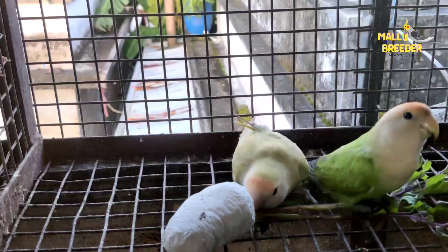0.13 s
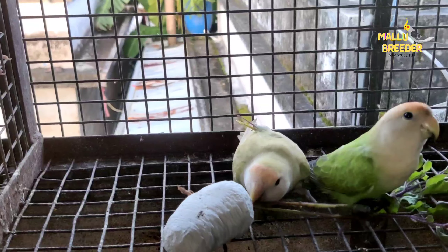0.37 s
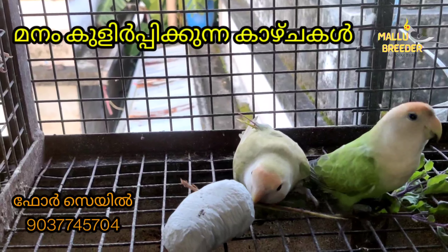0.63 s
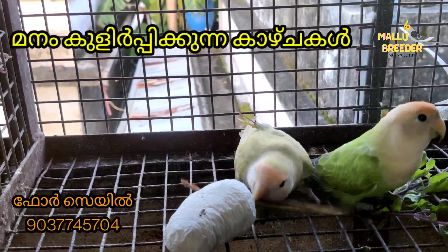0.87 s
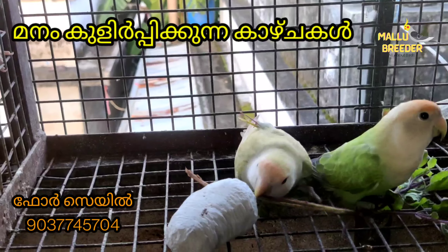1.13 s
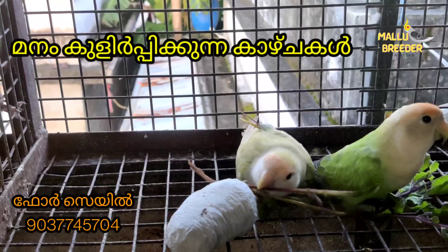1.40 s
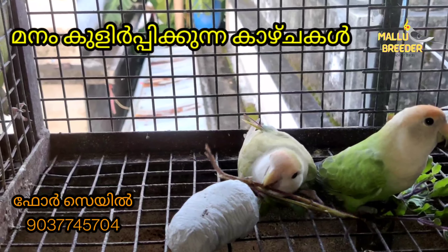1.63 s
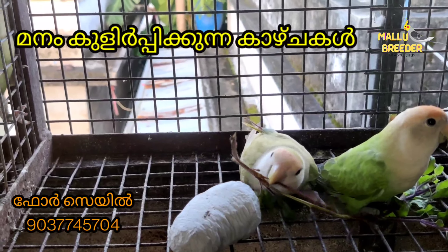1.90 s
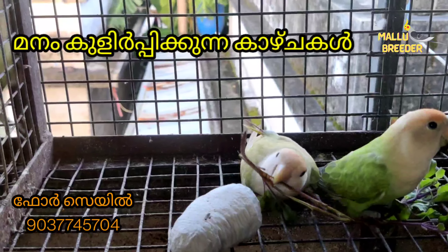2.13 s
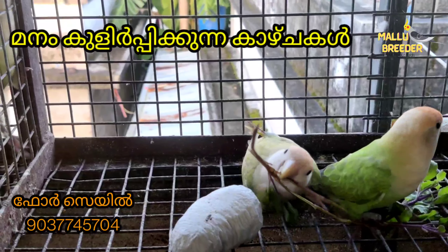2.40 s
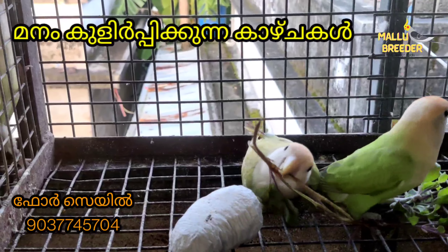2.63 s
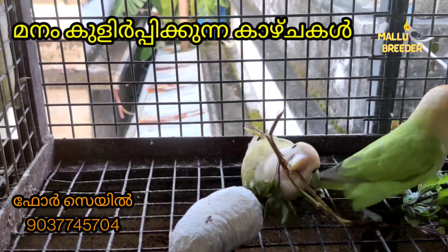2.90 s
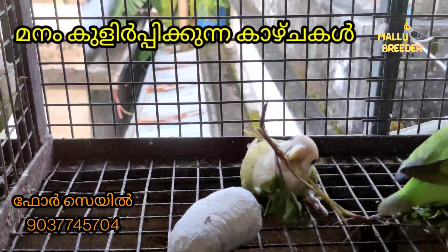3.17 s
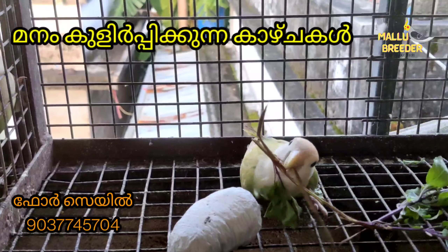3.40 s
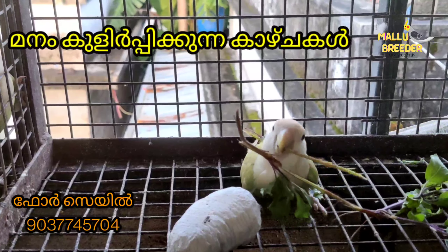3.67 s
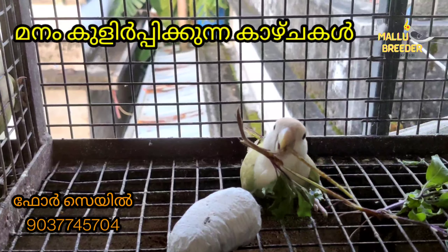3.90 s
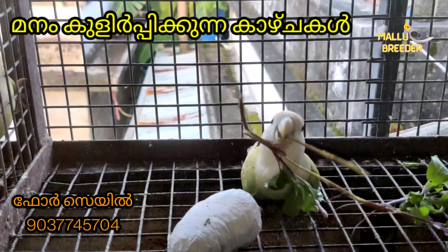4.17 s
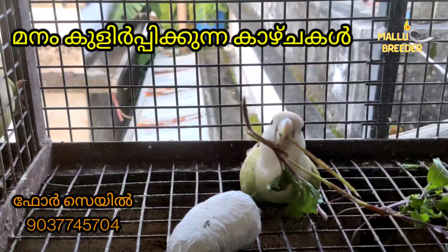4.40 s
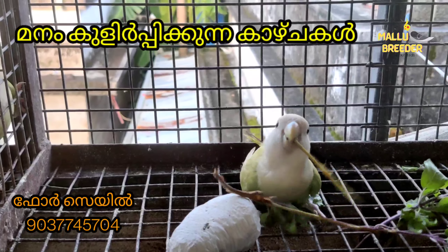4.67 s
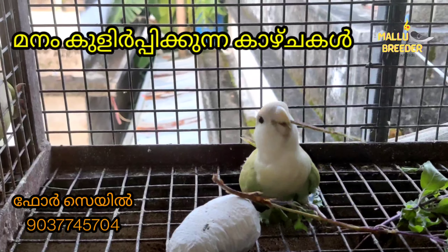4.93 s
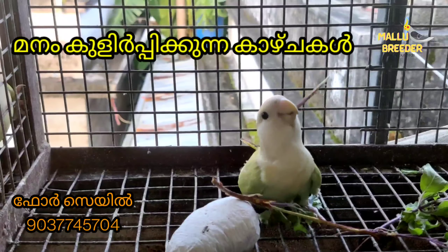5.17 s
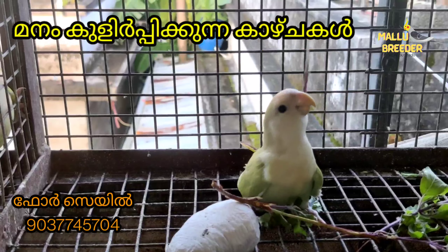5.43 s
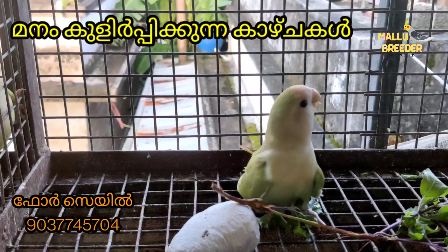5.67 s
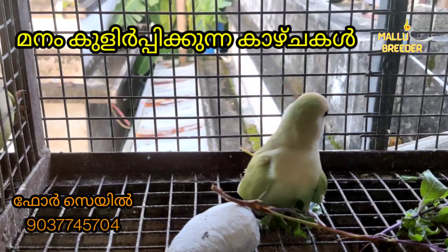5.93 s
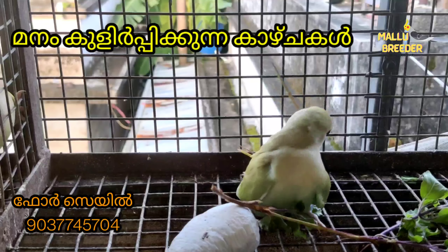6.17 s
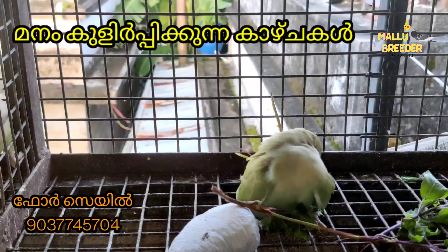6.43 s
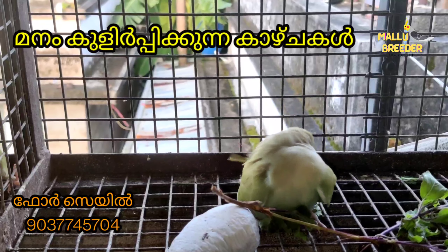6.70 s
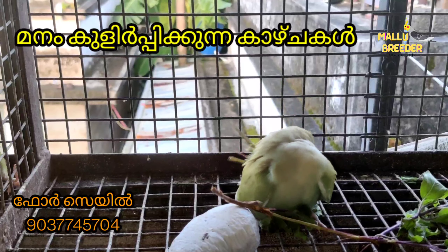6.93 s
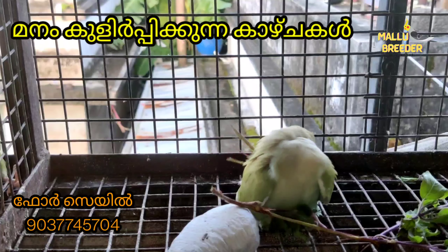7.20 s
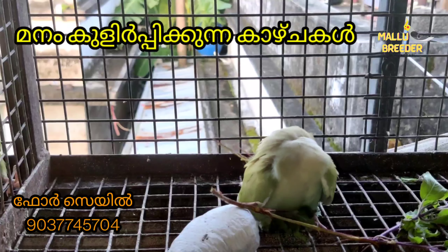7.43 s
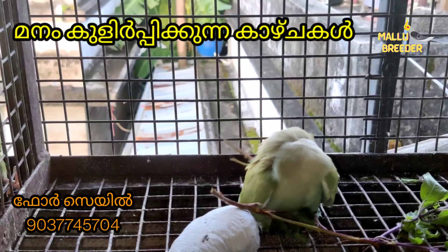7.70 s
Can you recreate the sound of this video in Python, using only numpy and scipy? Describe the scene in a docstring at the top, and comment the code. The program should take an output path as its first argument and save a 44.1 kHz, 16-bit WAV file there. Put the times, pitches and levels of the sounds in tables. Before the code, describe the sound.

Several small parrots call in wire cages in a hard-walled, partly open place. Scattered chirps, distant thin piping and light knocks on twig and wire come first, with outdoor rumble and rustle peaking early. Rasping squawks give way to crowded shrill twittering, then more squawks, a brief lull and one piercing scream. Close phone pickup, wide and bright, with a short reverberant tail.

```python
"""Small parrots chatter in wire cages: short gliding whistles, hoarse squawks, twitter and one long shrill scream.
A far bird pipes, beaks knock on twigs and wire, and outdoor rumble, rustle and hiss swell and sink behind them.
Voices are moving sine tones, roughened by random pitch and loudness, with noise for breath. Knocks are short
rings with a crack; the outdoor air is coloured noise. A phone with two microphone ports hears it all."""
import sys
import numpy as np
from scipy import signal
from scipy.fft import rfft, irfft, next_fast_len
from scipy.io import wavfile
from scipy.ndimage import uniform_filter1d

SR = 44100
rng = np.random.default_rng(int(sys.argv[2]) if len(sys.argv) > 2 else 0)


def magnitude_from_level(level_db):
    """Linear magnitude for a level in decibels (20 dB per decade)."""
    exponent = np.asarray(level_db, float) / 20
    return 10 ** exponent


def log_audio(samples):
    """Write samples as a 16-bit WAV file to the path given in sys.argv[1]."""
    # one column per channel
    frames = np.atleast_2d(samples).T
    # limit to full scale, then quantise
    limited = np.clip(frames, -1, 1)
    pcm = np.round(limited * 32767).astype(np.int16)
    wavfile.write(sys.argv[1], SR, pcm)


N = 344862
T = np.arange(N) / SR  # time in seconds
FFT = next_fast_len(N)
BIN_HZ = np.arange(FFT // 2 + 1) * SR / FFT

# Noise colours of rustle and hiss, used outdoors and in the scream's breath: [f/Hz, relative level/dB]
RUSTLE_COLOUR = [(71, -59.5), (120, -5), (572, -4), (1010, -10), (1220, -8), (3000, -18.5), (3900, -54.5),
                 (6600, -120)]
HISS_COLOUR = [(880, -11), (1500, -5.5), (4500, -2.5), (5940, 2), (7240, 7.5), (7920, 1), (13400, -14),
               (15100, -18.5), (16000, -52.5)]


def level(x, db):
    """Scale a sound to an rms level in dB."""
    return x * magnitude_from_level(db) / np.sqrt(np.mean(x ** 2))


def along(points, hz):
    """Read a (Hz, value) table on a logarithmic frequency axis."""
    at, value = np.transpose(points)
    return np.interp(np.log(hz + 1), np.log(at), value)


def colour(points, channels=1):
    """Noise with a given spectrum, silent outside the table's range, rms 1."""
    inside = (BIN_HZ >= points[0][0]) & (BIN_HZ <= points[-1][0])
    white = rfft(rng.standard_normal((channels, FFT)))
    shaped = white * magnitude_from_level(along(points, BIN_HZ)) * inside
    return level(irfft(shaped, FFT)[:, :N], 0)


def walk(rate, size=N):
    """Smooth random curve, rms 1, that turns about rate times a second."""
    k = max(int(SR / rate), 1)
    smooth = uniform_filter1d(rng.standard_normal(size), k)
    return level(uniform_filter1d(smooth, k), 0)


def tone(hz, k=1):
    """Sine at k times a moving pitch, rms 1."""
    return np.sqrt(2) * np.sin(2 * np.pi * k * np.cumsum(hz) / SR)


def played(rows, fade_s=0.005):
    """Turn a table of curves into one value per sample, with a gate that is open while the table lasts."""
    s, *columns = np.transpose(rows)
    gate = np.interp(T, [s[0] - fade_s, s[0], s[-1], s[-1] + fade_s], [0, 1, 1, 0])
    return [np.interp(T, s, c) for c in columns], gate


def air():
    """Outdoor noise: rumble mostly alike at both ports, rustle half alike, hiss unrelated."""
    # Loudness of the outdoor noise: [t/s, rumble level/dB, rustle level/dB, hiss level/dB]
    air_levels = [(0, -106, -100, -84), (.12, -72, -90, -79), (.25, -40.5, -53, -44.5),
                  (.6, -37.5, -40.5, -33.5), (1.9, -33.5, -45, -35.5), (2.07, -31.5, -36, -29.5),
                  (2.42, -33, -48.5, -34.5), (2.6, -26, -33.5, -27.5), (2.9, -44, -49, -38.5),
                  (4.2, -44, -52.5, -39.5), (5.4, -47, -54.5, -28), (6.95, -50.5, -57.5, -47),
                  (7.39, -53, -49.5, -27.5), (7.43, -68, -79, -42.5), (7.55, -59, -56.5, -51.5),
                  (7.82, -59, -63.5, -56.5)]
    # Noise colour of the rumble: [f/Hz, relative level/dB]
    rumble_colour = [(12, -9.5), (20, 2), (81, -7), (178, -17), (250, -13), (320, -21.5), (550, -120)]
    (rumble_db, rustle_db, hiss_db), _ = played(air_levels)
    rumble = colour(rumble_colour) + 0.24 * colour(rumble_colour, channels=2)
    rumble = rumble * magnitude_from_level(rumble_db + 0.5 * walk(8.5))
    rustle = colour(RUSTLE_COLOUR) + 0.94 * colour(RUSTLE_COLOUR, channels=2)
    left_right_db = np.array([[1.5], [-1.5]])
    rustle = rustle * magnitude_from_level(rustle_db + 2.4 * walk(19) + left_right_db)
    flicker_db = 1.2 * walk(14)
    hiss = colour(HISS_COLOUR, channels=2) * magnitude_from_level(hiss_db + flicker_db)
    return rumble + rustle + hiss


def far_birds():
    """Far piping and low murmurs: thin sine whistles that throb; random pitch makes the murmurs rattle."""
    # Far whistles and murmurs: [t/s, length/s, start f/Hz, end f/Hz, level/dB]
    piping = [(0.419, 0.098, 1176, 1185, -39), (.55, 0.093, 1294, 1128, -35),
              (0.636, 0.11, 1207, 1290, -39), (0.773, 0.052, 1333, 1110, -30),
              (0.896, 0.062, 1140, 1290, -35.5), (0.957, 0.19, 1243, 1436, -31.5),
              (1.138, 0.071, 1434, 1170, -34.5), (1.26, 0.074, 1250, 1183, -32),
              (1.396, 0.087, 1315, 1147, -32), (1.484, 0.12, 1217, 1266, -35.5),
              (2.001, 0.13, 1303, 1300, -33), (2.117, 0.12, 1198, 1207, -36.5),
              (2.264, 0.041, 1257, 1100, -33), (2.642, 0.12, 1377, 1214, -32.5),
              (2.794, .1, 1260, 1370, -39), (2.968, 0.1, 1556, 1507, -33.5),
              (3.054, 0.078, 1390, 1182, -45), (5.348, 0.119, 870, 825, -42.5),
              (5.536, .19, 889.5, 931, -43), (6.842, 0.13, 1352, 1270, -44.5),
              (7.505, 0.13, 1756, 1986, -41.5), (7.509, 0.094, 3530, 3870, -50.5),
              (7.585, .22, 560, 561, -53)]
    out, waver, rattle, throb = np.zeros(N), walk(90), walk(260), walk(55)
    for s, length, start_hz, end_hz, db in piping:
        i, n = int(s * SR), int(length * SR)
        is_murmur = start_hz < 1000
        shake = .022 * waver[i:i + n] + .16 * is_murmur * rattle[i:i + n]
        hz = np.linspace(start_hz, end_hz, n) * (1 + shake)
        shape = magnitude_from_level(db + 3.4 * throb[i:i + n]) * np.hanning(n) ** 0.12
        out[i:i + n] += shape * tone(hz)
    return out


def notes():
    """Clear wavering whistles; the beak resonance picks which partial (multiple of the pitch) leads."""
    # Clear whistles: [t/s, length/s, start f/Hz, end f/Hz, strongest partial's level/dB, beak resonance f/Hz]
    whistles = [(0.464, 0.017, 1880, 1900, -11, 7500), (0.489, 0.036, 3090, 3160, -37.5, 6500),
                (.498, 0.004, 2330, 2240, -20, 7100), (0.521, 0.012, 2920, 2330, -21.5, 2700),
                (0.546, 0.058, 3240, 3050, -32.5, 6300), (.585, 0.03, 2915, 2855, -23, 2900),
                (.587, 0.023, 3006, 2740, -20, 8600), (.63, 0.0063, 2790, 2120, -18, 7500),
                (.638, .03, 2190, 2070, -20.5, 6400), (1.246, 0.014, 1777, 1670, -31.5, 5100),
                (1.683, 0.013, 2023, 2174, -20, 6000), (1.685, 0.03, 3900, 4110, -18, 4000),
                (1.745, 0.038, 2333, 2210, -13.5, 6800), (1.79, .05, 2290, 2290, -33.5, 6800),
                (2.112, .039, 3420, 3544, -28, 7100), (2.274, 0.038, 5490, 5710, -27.5, 5300),
                (2.581, .032, 2190, 2180, -24, 6800), (2.728, 0.017, 3036, 3056, -9, 6200),
                (2.755, .048, 3522, 3660, -11, 7100), (3.382, .028, 2088, 2160, -19, 6400),
                (3.44, 0.041, 3826, 3296, -18.5, 7200), (3.561, 0.025, 2880, 2690, -16, 5600),
                (3.59, 0.037, 2465, 2470, -14.5, 7400), (3.636, 0.033, 4261, 4390, -18.5, 4400),
                (3.647, 0.026, 3720, 3600, -14, 7300), (3.721, 0.011, 3863, 3560, -21.5, 7500),
                (3.728, 0.033, 2186, 2390, -15.5, 4500), (3.807, .016, 4400, 3800, -32, 8000),
                (3.823, 0.017, 3820, 3280, -11, 7000), (3.845, 0.079, 3570, 3804, -24, 3600),
                (3.658, .02, 4800, 6100, -16.5, 5400), (3.953, 0.021, 4800, 6420, -11.5, 5600),
                (3.96, 0.063, 2370, 2227, -15.5, 7000), (4.05, 0.034, 2536, 2660, -14.5, 2600),
                (4.242, 0.021, 2027, 2088, -14.5, 6200), (4.264, 0.014, 2900, 2798, -14, 5700),
                (4.278, 0.017, 3300, 3390, -17.5, 3300), (4.306, 0.029, 3507, 3860, -6.5, 3600),
                (4.391, 0.0073, 1987, 1794, -11, 5600), (4.439, 0.044, 3226, 2814, -25.5, 3000),
                (4.501, 0.06, 2288, 2165, -24.5, 6800), (4.542, .03, 4670, 4513, -21, 4600),
                (4.582, 0.035, 3560, 3616, -22, 7200), (4.593, 0.038, 1940, 1913, -16.5, 5700),
                (4.619, 0.049, 3596, 3876, -16, 3700), (4.65, 0.013, 3520, 3500, -13, 6900),
                (4.677, 0.04, 3630, 3456, -15.5, 7100), (4.707, 0.055, 3706, 3675, -20.5, 3700),
                (4.747, 0.038, 4250, 4410, -25.5, 4300), (4.861, 0.042, 2307, 2023, -15, 4400),
                (4.917, 0.037, 3070, 3036, -28.5, 3100), (4.989, 0.042, 3240, 3700, -19.5, 7000),
                (5.002, 0.03, 2016, 2210, -22, 6300), (5.087, 0.041, 2440, 2640, -22.5, 5000),
                (5.103, 0.046, 3870, 3510, -18.5, 3800), (5.125, 0.03, 2171, 2183, -18, 6600),
                (5.136, 0.03, 4300, 4582, -10, 4400), (5.169, 0.0202, 4700, 5814, -19.5, 5200),
                (5.148, 0.02, 2140, 2310, -15.5, 6700), (5.167, .07, 2613, 3147, -19, 5600),
                (5.19, 0.047, 2326, 2150, -19.5, 6700), (5.222, 0.025, 2150, 2200, -16.5, 6500),
                (5.252, 0.041, 4158, 4130, -13.5, 4200), (5.337, .025, 4490, 4330, -12, 4400),
                (5.322, 0.083, 3920, 3713, -21, 3800), (5.412, 0.026, 2050, 2218, -18, 6400),
                (5.44, 0.07, 2606, 2740, -20, 5400), (5.496, 0.035, 4040, 3990, -23, 4000),
                (5.547, 0.04, 3206, 3703, -27, 6900), (5.578, 0.13, 1786, 1934, -16.5, 3700),
                (5.694, 0.097, 1833, 1875, -21.5, 3700), (5.76, 0.055, 3603, 3370, -22, 7100),
                (5.844, 0.017, 2380, 2346, -21.5, 7100), (6.014, 0.01, 2400, 2410, -21, 7200),
                (6.037, .035, 5000, 4820, -11.5, 5000), (6.066, 0.023, 4800, 3840, -6.5, 4400),
                (6.088, 0.036, 2294, 1954, -31.5, 2200), (6.191, .01, 1750, 2350, -21.5, 3500),
                (6.201, 0.016, 3240, 3490, -17, 3400), (6.212, .008, 3390, 4165, -16.5, 3800),
                (6.227, .016, 4360, 4670, -9.5, 4500), (6.229, .015, 3140, 3170, -19, 6300),
                (6.48, .025, 3650, 3600, -34.5, 3600), (6.565, 0.053, 2206, 2020, -30, 2100),
                (6.618, 0.032, 2905, 3046, -26.5, 3000), (6.522, 0.068, 4776, 3963, -12.5, 4400),
                (6.955, .028, 2610, 2575, -23, 5300), (6.989, 0.02, 3550, 3600, -17, 7100),
                (6.984, 0.017, 1757, 1768, -36, 7100), (7.002, 0.046, 4780, 4510, -18.5, 4600),
                (7.019, .048, 2004, 2000, -20, 4000)]
    out, waver, throb = np.zeros(N), walk(177), walk(360)
    for s, length, start_hz, end_hz, db, beak_hz in whistles:
        i, n = int(s * SR), int((length + 0.0065) * SR)
        u = np.linspace(0, 1, n)  # progress through the note
        hz = (start_hz + (end_hz - start_hz) * u) * (1 + 0.0181 * waver[i:i + n])
        swell, fade = np.clip(u / .08, 0, 1), np.clip((1 - u) / .3, 0, 1)
        shape = swell * fade * magnitude_from_level(3 * throb[i:i + n])
        lead = max(round(2 * beak_hz / (start_hz + end_hz)), 1)
        for k in range(1, 7):
            if k * hz.max() < .36 * SR:
                # small beaks radiate little above the head resonance
                dull_db = 9 * (k > lead and k * start_hz > 8300)
                partial_db = db - 9.5 * abs(k - lead) ** 0.52 - dull_db
                out[i:i + n] += magnitude_from_level(partial_db) * shape * tone(hz, k)
    return out


def calls(rows, attack_s, fade_db_per_s, rise_per_s=0):
    """Each call swells, holds and dies away; gives pitch and the gains of both bands per sample."""
    hz, gains = np.full(N, float(rows[0][2])), np.zeros((2, N))
    for s, held_s, call_hz, low_db, shrill_db in rows:
        i = int(s * SR)
        t = T[:int((held_s + 60 / fade_db_per_s) * SR)]
        fade = magnitude_from_level(-fade_db_per_s * np.clip(t - held_s, 0, None))
        shape = np.clip(t / attack_s, 0, 1) * fade
        hz[i:] = call_hz
        hz[i:i + len(t)] *= 1 + rise_per_s * (t - held_s / 2)
        gains[:, i:i + len(t)] += magnitude_from_level(np.array([[low_db], [shrill_db]])) * shape
    return hz, gains


def twitter(hz, reach, note_s=.034):
    """A run of short notes at an uneven pace, each with its own pitch, steep glide and size."""
    beat = np.cumsum(magnitude_from_level(3 * walk(12))) / (note_s * SR)
    k, u = beat.astype(int), beat % 1  # note number, progress through that note
    pitch, glide, size = rng.standard_normal((k[-1] + 1, 3)).clip(-2, 2).T
    note_hz = hz * np.exp(reach * (pitch[k] + glide[k] * (u - .5)) + .018 * walk(250))
    shape = np.clip(8 * u, 0, 1) * (1 - u) ** .6 * magnitude_from_level(4 * size[k])
    return note_hz, shape


def throat(spread, harsh_calls, light_calls, breath_db=-13):
    """One throat: a squawk shakes the pitch into a band of 2-3 ms bursts; twitter draws thin strokes."""
    # Air through the beaks: [f/Hz, relative level/dB]
    breathy = [(710, -85), (1200, -19.5), (2350, 8), (3290, 6), (4500, 8.5), (7100, 15.5), (8000, 7),
               (13900, -4), (15500, -33), (16000, -91.5)]
    twitter_rasp = .25  # share of squawk roughness mixed into twitter
    (harsh_hz, harsh), (light_hz, light) = harsh_calls, light_calls
    # the louder kind of call sets the pitch
    hz = np.where(harsh.sum(axis=0) > light.sum(axis=0), harsh_hz, light_hz)
    # the shrill band is an overtone held near the head resonance
    over_hz = 7000 + 0.43 * (hz - 3800) + 4500 * (spread - 1)
    # breath follows both bands; a squawk has less air than twitter
    breath_gain = np.sqrt(np.prod(magnitude_from_level(-2) * harsh + light, axis=0))
    out = colour(breathy)[0] * magnitude_from_level(3.14 * walk(150) + breath_db) * breath_gain
    bands = (spread * hz, .15), (.96 * over_hz, .09)  # low, shrill: (centre Hz, reach of pitch)
    for band, (centre_hz, reach) in enumerate(bands):
        shaken_hz = centre_hz / spread ** .4 * (1 + .04 * walk(550))
        squawk = magnitude_from_level(4 * walk(380).clip(-2, 2)) * tone(shaken_hz)
        note_hz, shape = twitter(centre_hz, reach)
        half_pitch = 0.079 * (note_hz > 3600) * tone(note_hz, .5)
        strokes = shape * (tone(note_hz) + half_pitch)
        out = out + (harsh[band] + twitter_rasp * light[band]) * level(squawk, -10)
        out = out + light[band] * level(strokes, -11)
    return out


def knocks():
    """Beaks on twig and wire: a short ring and a noisy crack for each knock."""
    # Knocks: [t/s, ring's starting level/dB, ring f/Hz]
    knock_list = [(0.547, -24, 393), (0.766, -24, 686), (0.875, -19.5, 818), (0.923, -27, 735),
                  (1.093, -14, 734), (1.181, -23, 330), (1.641, -20, 592), (2.048, -20.5, 650),
                  (2.491, -20.5, 324.7), (2.515, -17.5, 636), (5.176, -30, 703.6)]
    out, t = np.zeros(N), T[:3000]
    cracks = rng.standard_normal((len(knock_list), len(t)))
    for (s, db, hz), crack in zip(knock_list, cracks):
        ring = np.sin(2 * np.pi * hz * t) * magnitude_from_level(-60 * t / 0.024)  # falls 60 dB in 24 ms
        crack = uniform_filter1d(crack, size=3) * magnitude_from_level(-60 * t / 0.017)
        i = int(s * SR)
        out[i:i + len(t)] += magnitude_from_level(db) * (ring + 0.28 * crack)
    return out


def scream():
    """A long stack of partials; a hoarse share shakes the pitch into a rough smear, air rushes along, a late
    flutter sets in and adds sidebands."""
    # Course of the scream: [t/s, level/dB, hoarse share of the power (0-1)]
    course = [(7.04, -12, 0.42), (7.075, -4, 0.26), (7.12, -4, 0), (7.225, -7, 0.12), (7.24, -2.5, 0.5),
              (7.26, -4, 0.25), (7.385, -7, 0.2), (7.41, -20, 0.41)]
    # Strength of each partial: [multiple of the pitch, relative level/dB]
    partials = [(1, -34), (2, -10), (3, -10.5), (4, 6), (5, -12.5), (6, 3), (7, 6), (8, -15), (9, -14.5),
                (10, -17.5), (11, -21), (12, -37), (13, -40), (14, -32)]
    # Pitch of the scream: [t/s, f/Hz]
    pitch = [(7.04, 985), (7.075, 1022), (7.12, 1035), (7.234, 1036), (7.243, 1061), (7.41, 1062)]
    flutter_from_s, flutter_hz, flutter_depth = 7.24, 99.6, 0.2  # depth is rms
    (db, hoarse), gate = played(course)
    on, out = gate > 0, np.zeros(N)
    hz = np.interp(T, *np.transpose(pitch))
    steady_hz = (hz * (1 + 0.0012 * walk(60)))[on]
    shaky_hz = (hz * (1 + 0.02685 * walk(300)))[on]
    clean = sum(magnitude_from_level(g) * tone(steady_hz, round(k)) for k, g in partials)
    clean = clean * magnitude_from_level(2.1 * walk(70)[on])
    flutter_tone = tone(flutter_hz * (1 + 0.031 * walk(30)[on]))
    flutter = 1 + flutter_depth * (T[on] > flutter_from_s) * flutter_tone
    shaken = sum(magnitude_from_level(0.84 * g) * tone(shaky_hz, round(k)) for k, g in partials[:9])
    hoarse = np.clip(hoarse[on], 0, 1)
    out[on] = np.sqrt(1 - hoarse) * level(clean * flutter, 0) + np.sqrt(hoarse) * level(shaken, 0)
    out = out + magnitude_from_level(-22) * colour(HISS_COLOUR)[0] + magnitude_from_level(-38) * colour(RUSTLE_COLOUR)[0]
    return gate * magnitude_from_level(db) * out


def ports(x, lag_s=0.000587):
    """Two ports: the left hears x later by lag_s (earlier if negative); they differ in colour, sharing the power."""
    # Left port's level over the right port's: [f/Hz, difference/dB]
    left_over_right = [(300, 7.5), (1300, 4.5), (3000, 4), (5000, 2.5), (7200, -12), (10000, 0), (15000, 0)]
    ratio = magnitude_from_level(2 * along(left_over_right, BIN_HZ))  # power ratio
    left = np.sqrt(2 * ratio / (1 + ratio)) * np.exp(-2j * np.pi * BIN_HZ * lag_s)
    right = np.sqrt(2 / (1 + ratio))
    return irfft(rfft(x, FFT) * np.array([left, right]), FFT)[:, :N]


def room(x):
    """Dense echoes off walls and cages: fading noise as the echo pattern, a different one for each port."""
    t60_s, room_db = .15, -5  # time to fall 60 dB, echo level
    t = T[:int(.4 * SR)]
    tail = rng.standard_normal((2, len(t))) * magnitude_from_level(-60 * t / t60_s) * (t > .002)
    tail = tail / np.sqrt(np.sum(tail ** 2) / 2)
    return magnitude_from_level(room_db) * signal.fftconvolve(x, tail, axes=1)[:, :N]


def scene():
    """Birds in several cages, far birds and knocks reach the ports straight and by the walls, over outdoor air."""
    # Harsh squawks: [t/s, held/s, f/Hz, low band level/dB, shrill band level/dB]
    squawks = [(.465, .02, 3900, -22.5, -12), (.8, 0.036, 4500, -38, -25), (.93, 0.036, 4470, -40, -26.5),
               (1.07, 0.019, 3000, -47, -32), (1.248, 0.016, 4500, -34, -22),
               (1.42, 0.048, 4500, -56.5, -31), (1.684, 0.021, 3900, -16, -14.5),
               (1.96, 0.087, 4500, -33, -30), (2.112, 0.037, 4300, -33, -23), (2.27, 0.046, 4900, -28, -42),
               (2.578, 0.022, 4660, -23.5, -13.5), (2.722, 0.08, 3550, -18.5, -6.5),
               (2.882, .09, 4050, -12, -17.5), (3.056, 0.11, 4050, -14, -14),
               (3.283, 0.086, 3150, -20.5, -12), (5.555, 0.19, 3900, -15, -11.5),
               (6.25, 0.13, 4500, -19, -17.5), (6.5, 0.068, 4350, -20, -19.5),
               (6.625, 0.055, 4000, -20, -13.5), (6.69, 0.044, 4500, -12.5, -20.5),
               (6.76, 0.039, 4850, -23, -62), (6.84, 0.0399, 4830, -45, -35.5)]
    # Bursts of twitter: [t/s, held/s, f/Hz, low band level/dB, shrill band level/dB]
    twitters = [(.49, 0.024, 3003, -22, -18), (.64, 0.042, 3284, -29, -25), (3.39, 0.038, 4350, -23, -16),
                (3.45, 0.055, 3580, -19, -27), (3.56, 0.073, 4277, -20, -21),
                (3.642, 0.048, 4413, -14.5, -17), (3.715, 0.085, 4390, -16.5, -20),
                (3.81, 0.08, 3483, -23.5, -19.5), (3.932, 0.095, 4800, -19, -19),
                (4.051, 0.052, 3980, -15.5, -25), (4.24, 0.032, 3983, -12, -18.5),
                (4.28, 0.06, 3630, -17.5, -11.5), (4.385, 0.023, 3695, -19, -16.5),
                (4.42, 0.043, 3052, -32, -26), (4.497, 0.11, 4335, -22, -21),
                (4.586, 0.07, 4548, -11.5, -12.5), (4.68, 0.093, 3804, -14, -24.5),
                (4.8, 0.027, 4500, -26, -44), (4.84, 0.027, 4424, -12.5, -29),
                (4.92, 0.016, 3130, -17, -20), (4.985, 0.057, 4177, -13.5, -34),
                (5.075, .1, 4483, -15.5, -6), (5.19, 0.069, 3816, -15, -20.5),
                (5.3, 0.051, 4410, -15.5, -15.5), (5.42, 0.16, 4610, -20, -18), (5.6, .15, 5000, -26, -19),
                (5.8, 0.043, 4880, -21, -30), (5.85, 0.075, 4735, -19.5, -22),
                (5.92, 0.082, 3910, -19, -26), (6.03, 0.047, 4575, -19.5, -17),
                (6.135, 0.011, 3516, -17, -17), (6.19, 0.043, 3897, -20, -13.5),
                (6.945, 0.025, 4740, -21, -20), (6.985, 0.086, 4280, -17.5, -12)]
    hz, gains = calls(squawks, attack_s=0.00795, fade_db_per_s=350.5, rise_per_s=.5)
    harsh = hz, gains * magnitude_from_level(2.5 * walk(258).clip(-2, 2))  # the rasp comes in uneven spurts
    light = calls(twitters, attack_s=.006, fade_db_per_s=463)
    cages = [(.91, 0.0005156), (1.01, -0.0043), (1.1, 0.000192)]  # (pitch factor, port lag s)
    flock = sum(ports(throat(spread, harsh, light), lag_s) for spread, lag_s in cages)
    far = flock + ports(scream()) + ports(far_birds(), lag_s=0.00026) + knocks()
    near = ports(notes())
    near_wet = .55  # the clear whistles send less into the echoes
    return far + near + room(far + near_wet * near) + air()


def band_limit(x):
    """A steep low-pass at the top of the band."""
    return signal.sosfilt(signal.butter(12, 16380, fs=SR, output="sos"), x)


def record(dry):
    """The phone rounds the loudest peaks and cuts the top above 15.9 kHz."""
    rounded = np.tanh(1.1 * dry) / 1.2
    top_cut = signal.ellip(8, .2, 70, 15900, fs=SR, output="sos")
    mix = signal.sosfilt(top_cut, rounded)
    return band_limit(mix)


dry = scene()
out = record(dry)
log_audio(out)
```